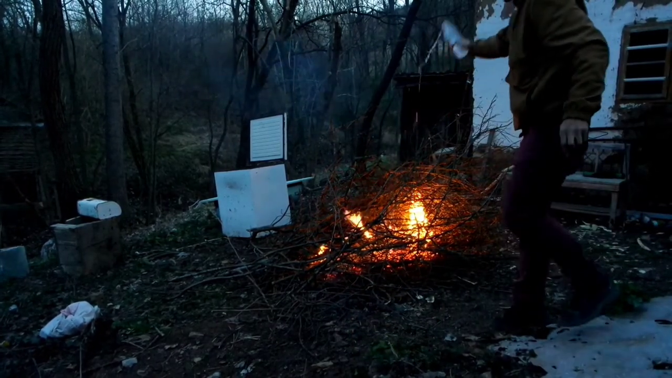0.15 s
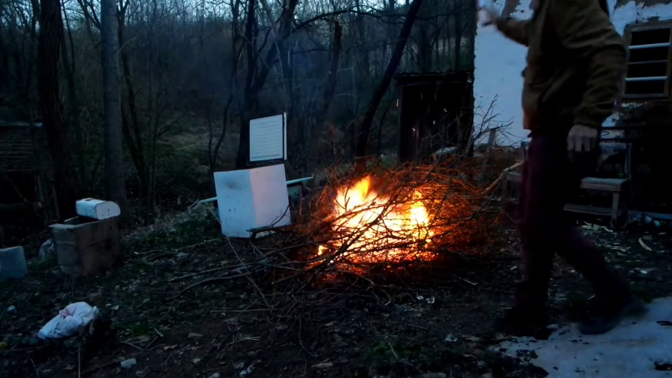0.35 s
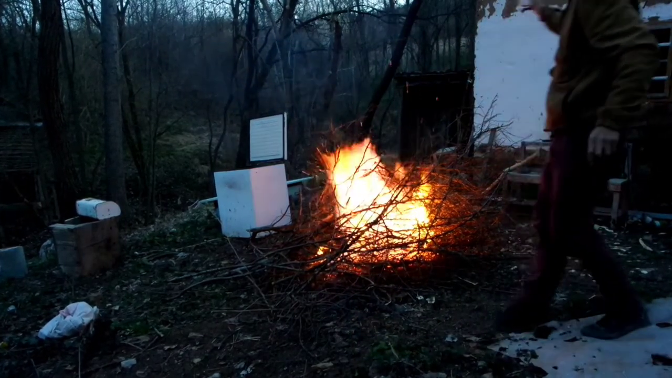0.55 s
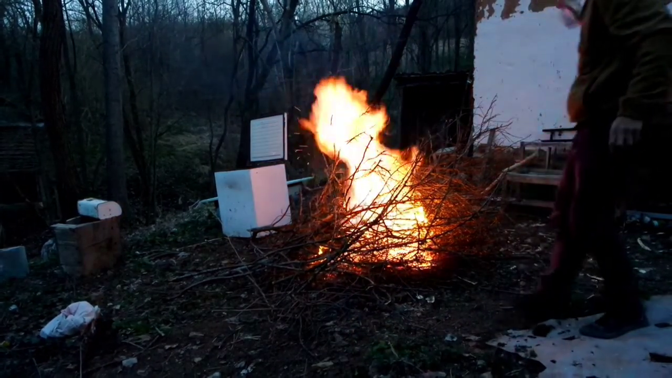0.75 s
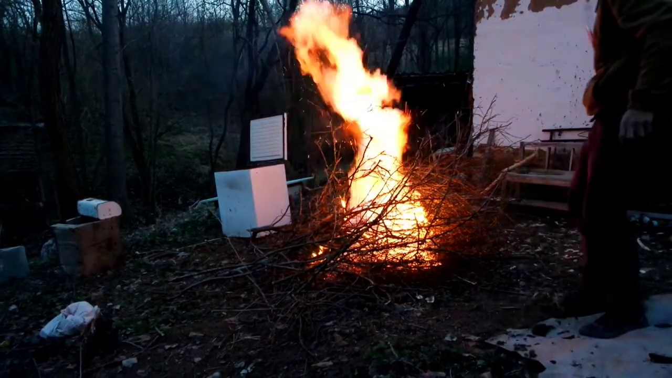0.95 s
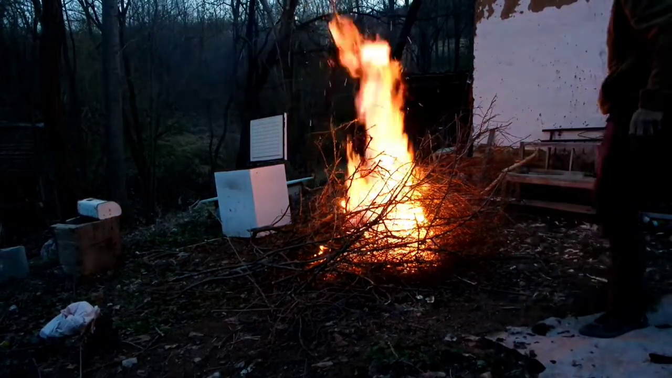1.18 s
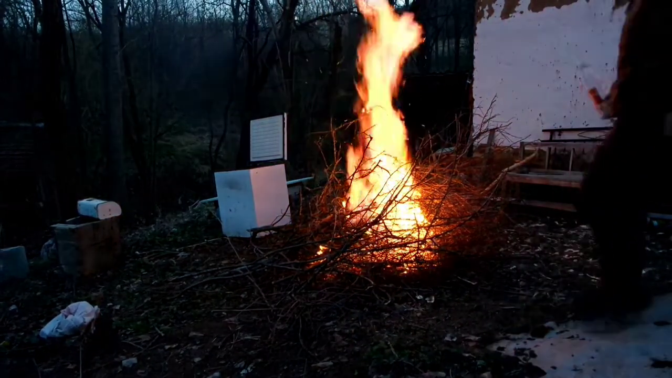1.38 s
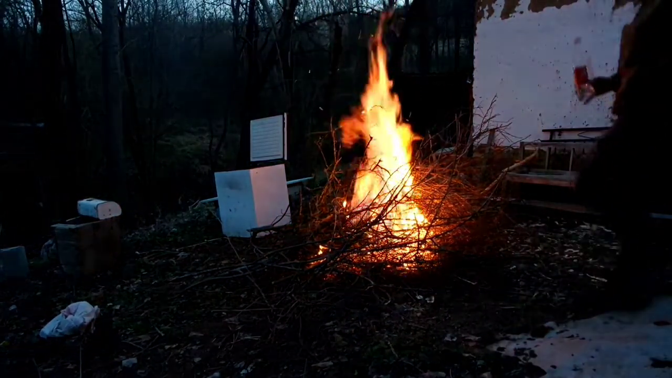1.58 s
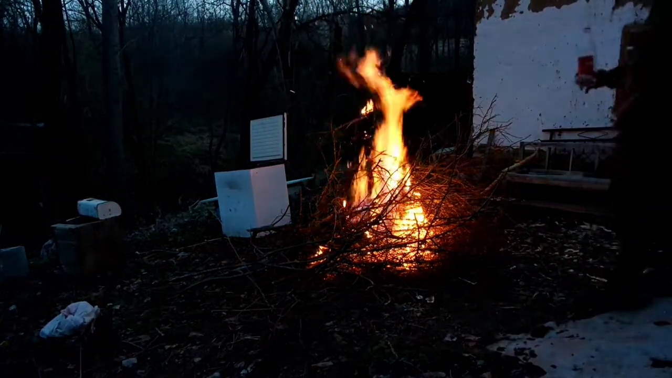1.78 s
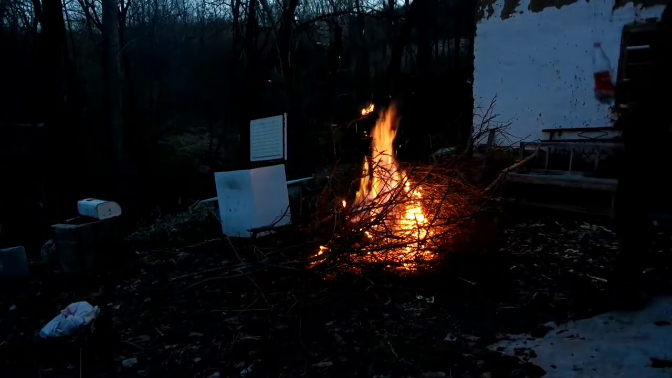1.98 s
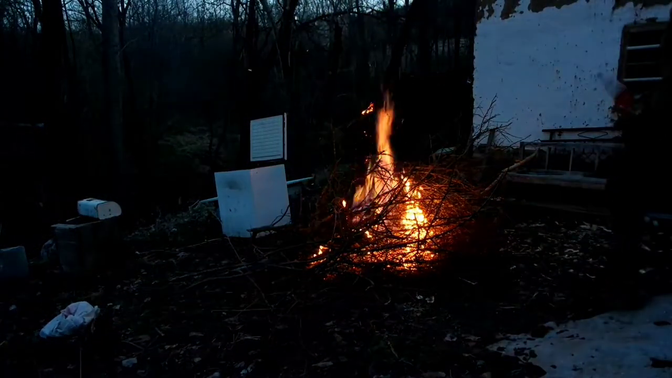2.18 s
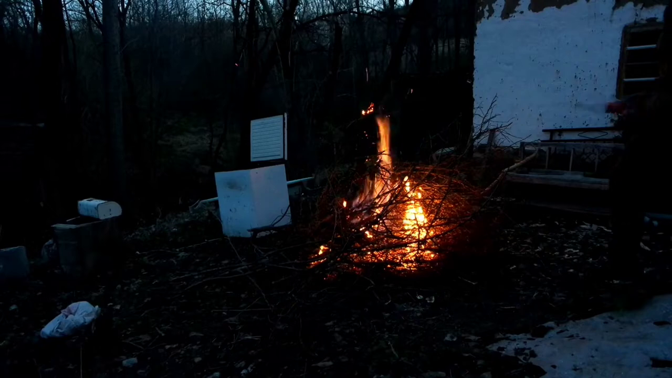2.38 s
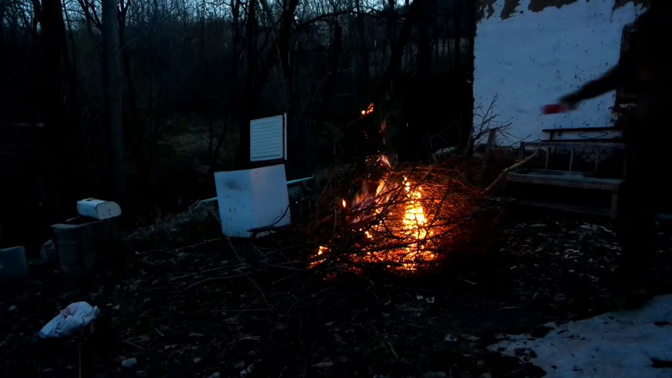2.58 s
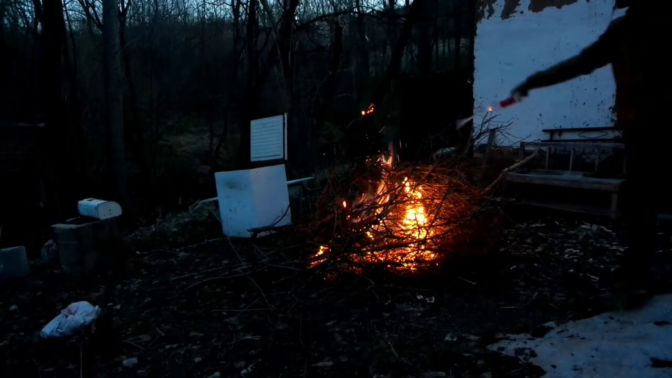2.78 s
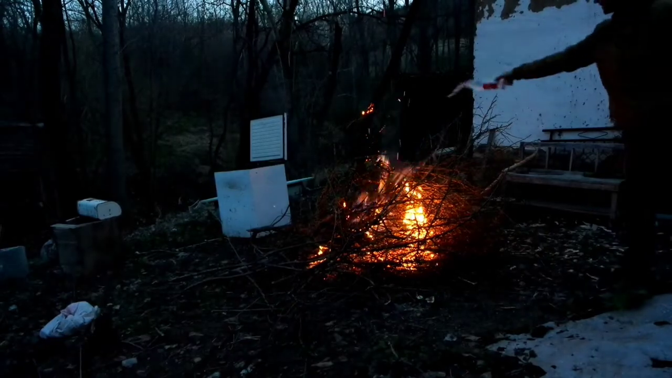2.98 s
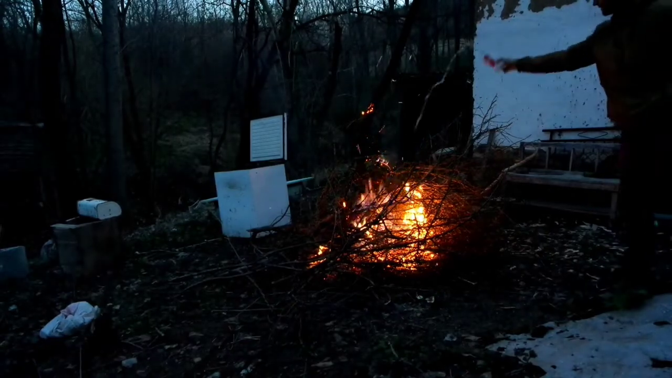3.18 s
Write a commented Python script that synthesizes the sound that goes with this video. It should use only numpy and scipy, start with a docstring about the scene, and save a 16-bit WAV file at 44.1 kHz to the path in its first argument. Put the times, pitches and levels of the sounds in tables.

```python
"""A pile of wet branches flares up in a garden: a rumbling, fluttering flame over sizzling bark.
Flame and bark are shaped noise, faint at first, with a deep whoomph at 0.5 s as the fireball rises.
A songbird whistles gliding notes from the trees behind; steps crunch as swells of grainy noise.
From 0.2 s twigs snap as ringing pulses and fuel splashes down as spatter, flare and puff.
From 0.66 s steam pockets pop as short ringing bursts."""
import sys
import numpy as np
from scipy import signal
from scipy.fft import rfft, irfft
from scipy.io import wavfile
from scipy.ndimage import uniform_filter1d

SR = 44100
rng = np.random.default_rng(int(sys.argv[2]) if len(sys.argv) > 2 else 0)


def unload_wav(signal):
    """Save mono or channel-first audio to the path in sys.argv[1] as 16-bit WAV at rate SR, clipped to [-1, 1]."""
    wavfile.write(
        sys.argv[1],
        SR,
        np.round(np.clip(np.atleast_2d(signal).T, -1, 1) * 32767).astype(np.int16),
    )


N = 145530
T = np.arange(N) / SR


def amp(db):
    """Decibels to gain."""
    return 10 ** (np.asarray(db) / 20)


def evened(x):
    """Scales to rms 1."""
    return x / np.sqrt(np.mean(x ** 2) + 1e-20)


def level(points):
    """Gain over time from (t/s, level/dB) points."""
    return amp(np.interp(T, *np.transpose(points)))


def add(mix, s, sound):
    """Mixes a sound in at time s, cut at the end of the mix."""
    part = mix[max(round(s * SR), 0):][:len(sound)]
    part += sound[:len(part)]


def colour(x, points):
    """Filters x by a curve of (f/Hz, level/dB) points, scaled to rms 1."""
    hz, db = np.transpose(points)
    bins_hz = np.fft.rfftfreq(N, 1 / SR)
    gain = amp(np.interp(np.log(bins_hz + 1), np.log(hz), db))
    return evened(irfft(rfft(x) * gain, N))


def noise(points):
    """Coloured noise, rms 1."""
    return colour(rng.standard_normal(N), points)


def wander(hz):
    """Smooth random signal with a Gaussian roll-off at hz, rms 1."""
    lowpass = np.exp(-(np.fft.rfftfreq(N, 1 / SR) / hz) ** 2)
    return evened(irfft(rfft(rng.standard_normal(N)) * lowpass, N))


def steadied(x, span_s):
    """Divides out the running rms, removing slow swells."""
    return x / np.sqrt(abs(uniform_filter1d(x ** 2, int(span_s * SR))) + 1e-9)


def band(x, hz, q):
    """Second-order band-pass resonance."""
    w = 2 * np.pi * min(hz, SR / 2 - 1) / SR
    a = np.sin(w) / (2 * q)
    return signal.lfilter([a, 0, -a], [1 + a, -2 * np.cos(w), 1 - a], x)


def echoes(x, t60_s, rise_s=0.0019):
    """Diffuse scatter from branches and trees: a decaying noise tail of unit energy."""
    t = T[:SR // 2]
    tail = rng.standard_normal(len(t)) * amp(-60 * t / t60_s) * np.minimum(t / rise_s, 1)
    return signal.fftconvolve(x, tail / np.linalg.norm(tail))[:N]


# flame size, heard as rumble: t/s, level/dB
FLAME_LEVEL = [(0, -73), (.08, -59.5), (.19, -69), (.27, -59), (.33, -59.5), (.44, -52), (.53, -39.5),
               (.76, -40.5), (1.03, -35.5), (1.42, -38.5), (1.62, -38), (1.67, -42.5), (1.76, -38.5),
               (1.96, -37.5), (2.08, -40), (2.3, -42), (2.43, -49.5), (3.12, -53), (3.3, -54)]
# rumble spectrum: f/Hz, relative level/dB
RUMBLE_SPECTRUM = [(12, -5), (27, -6.5), (41, -13), (60, 0.5), (78, -4), (100, -3.5), (113, -5.5), (133, 0),
                   (158, -1), (175, -15), (200, -5), (280, -11), (350, -15), (500, -22), (900, -23.5),
                   (3000, -76)]
# mid-range roar: t/s, level/dB
ROAR_LEVEL = [(0, -50), (.06, -73), (.12, -65.5), (.2, -71.5), (.24, -61), (.45, -58), (.6, -44),
              (.92, -44.5), (1.1, -48), (1.35, -49), (1.56, -45.5), (1.68, -54.5), (1.9, -51), (2.12, -48),
              (2.24, -58.5), (2.44, -62.5), (2.72, -59), (2.82, -59), (2.96, -66.5), (3.08, -59),
              (3.3, -65)]
# roar spectrum: f/Hz, relative level/dB
ROAR_SPECTRUM = [(100, -50), (250, -3.5), (400, 2), (490, -2.5), (570, 1), (700, -10), (1100, -7.5),
                 (1600, -9.5), (2200, -8), (3200, -9.5), (5000, -14), (10000, -24)]
THROB_HZ, THROB_PASS_WIDTH_HZ, THROB_DB = 153.9, 20.4, -6  # main resonance, two passes
WHOOMPH_S, WHOOMPH_HZ, WHOOMPH_Q, WHOOMPH_DB = 0.505, 65.5, 1.7, -41
WHOOMPH_ATTACK_S, WHOOMPH_DECAY_S = 0.0083, 0.35
FLUTTER_RMS_DB, FLUTTER_HZ = 3, 75.6


def flame():
    """A throbbing rumble under a fluttering roar; the rising fireball adds a deep whoomph."""
    q = THROB_HZ / THROB_PASS_WIDTH_HZ
    throb = evened(band(band(rng.standard_normal(N), THROB_HZ, q), THROB_HZ, q))
    rumble = steadied(noise(RUMBLE_SPECTRUM) + amp(THROB_DB) * throb, 0.15)

    flutter = amp(FLUTTER_RMS_DB * wander(FLUTTER_HZ))
    roar = steadied(evened(noise(ROAR_SPECTRUM) * flutter), 0.071)

    deep = band(rng.standard_normal(N), WHOOMPH_HZ, WHOOMPH_Q)
    deep = steadied(band(deep, WHOOMPH_HZ, WHOOMPH_Q), 0.07)
    age_s = np.maximum(T - WHOOMPH_S, 0)
    envelope = np.minimum(age_s / WHOOMPH_ATTACK_S, 1) * np.exp(-age_s / WHOOMPH_DECAY_S)
    whoomph = amp(WHOOMPH_DB) * deep * envelope
    return rumble * level(FLAME_LEVEL) + roar * level(ROAR_LEVEL) + whoomph


# sizzling bark: t/s, level/dB
SIZZLE_LEVEL = [(0, -60), (.2, -70), (.24, -55), (.38, -51.5), (.55, -47.5), (.72, -43.5), (.92, -44),
                (1.05, -48), (1.2, -43.5), (1.42, -45.5), (1.56, -43), (1.67, -49), (1.95, -46),
                (2.14, -48), (2.33, -47), (2.44, -56), (2.8, -60), (2.95, -62), (3.07, -61), (3.3, -55)]
# sizzle spectrum: f/Hz, relative level/dB
SIZZLE_SPECTRUM = [(500, -26), (1800, -4), (2900, -3), (4200, -1), (5300, -4), (6600, -1.5), (8200, 2),
                   (10500, 1), (13000, -2), (15000, -6.5)]
TICKS_PER_S, TICK_DB, HISS_DB = 420, -6, -2.5
HISS_FLICKER_RMS_DB, HISS_FLICKER_HZ = 2.2, 50


def sizzle():
    """Steam hisses from the bark; tiny bursting bubbles tick as random equal impulses."""
    ticks = rng.choice([-1, 1], N) * (rng.random(N) < TICKS_PER_S / SR)
    flicker = amp(HISS_FLICKER_RMS_DB * wander(HISS_FLICKER_HZ))
    hiss = evened(noise(SIZZLE_SPECTRUM) * flicker)
    mixed = amp(HISS_DB) * hiss + amp(TICK_DB) * colour(ticks, SIZZLE_SPECTRUM)
    return mixed * level(SIZZLE_LEVEL)


# bird notes: t/s, length/s, level/dB, start f/Hz, middle f/Hz, end f/Hz
BIRD_NOTES = [(0.015, 0.081, -55.5, 5800, 6140, 4350), (0.131, 0.032, -56, 4100, 4147, 4170),
              (0.236, 0.05, -45.5, 5100, 5060, 5700), (0.347, 0.049, -52, 5400, 4370, 4000),
              (.453, 0.048, -45.5, 5060, 5120, 5670), (0.557, 0.046, -45, 5300, 4500, 3920),
              (0.666, 0.0414, -42, 5110, 5120, 5680), (1.115, .1, -41.5, 6700, 5910, 5860),
              (1.297, 0.045, -46, 4010, 4070, 3500), (1.515, 0.06, -52, 3650, 4070, 4400),
              (1.6, .068, -49, 3550, 3920, 4360), (1.714, 0.077, -47.5, 3330, 3900, 4440),
              (1.833, 0.065, -45.5, 3450, 3810, 4330), (1.951, .064, -45, 3450, 3950, 4760),
              (2.091, 0.11, -48, 7450, 7220, 7030), (2.256, 0.066, -45, 5700, 5100, 3920),
              (2.757, 0.136, -56.5, 2220, 2270, 2166), (3.004, 0.042, -50, 7500, 6950, 6300),
              (3.067, 0.044, -54, 5100, 4070, 3420), (3.191, .052, -50, 6100, 5950, 5960),
              (3.264, .04, -54.5, 6020, 6000, 5920)]
ATTACK_SHARE, RELEASE_SHARE, SWELL_DB = 0.14, 0.16, 7  # shares of length; rise along note
WAVER_RMS, WAVER_HZ = 0.006, 120  # relative pitch
TRUNKS_T60_S, WOOD_DB, WOOD_T60_S, WOOD_RISE_S = 0.09, -4.5, 0.42, 0.018


def bird():
    """Gliding whistles with slight pitch waver, smeared by nearby trunks and by the wood."""
    out, waver = np.zeros(N), 1 + WAVER_RMS * wander(WAVER_HZ)
    for s, length_s, db, start_hz, middle_hz, end_hz in BIRD_NOTES:
        u = np.arange(0, 1, 1 / (length_s * SR))  # share of note elapsed
        glide = np.polyfit([0, 0.5, 1], [start_hz, middle_hz, end_hz], 2)
        hz = np.polyval(glide, u) * np.interp(s + u * length_s, T, waver)
        edges = np.clip(np.minimum(u / ATTACK_SHARE, (1 - u) / RELEASE_SHARE), 0, 1)
        shape = edges * amp(SWELL_DB * (u - 0.5))
        add(out, s, amp(db) * shape * np.sin(2 * np.pi * np.cumsum(hz) / SR))
    scattered = 0.72 * out + 0.5 * echoes(out, TRUNKS_T60_S)
    return scattered + amp(WOOD_DB) * echoes(out, WOOD_T60_S, WOOD_RISE_S)


# steps on snow and litter: swell centre t/s, Gaussian half-width/s, level/dB, band centre f/Hz
STEPS = [(0.048, 0.021, -59.5, 2800), (0.748, .025, -44, 3000), (1.294, 0.039, -37, 8060),
         (1.488, 0.021, -31, 5800), (1.553, 0.0076, -42, 1800), (2.063, 0.015, -40, 730),
         (2.145, 0.016, -44, 2160), (2.302, 0.041, -44, 4120)]
STEP_Q, STEP_GRAIN_RMS_DB, STEP_GRAIN_HZ = 0.28, 4, 270


def steps():
    """Short swells of grainy broadband noise as a boot presses down."""
    out = np.zeros(N)
    for s, width_s, db, hz in STEPS:
        grain = amp(STEP_GRAIN_RMS_DB * wander(STEP_GRAIN_HZ))
        crunch = evened(band(rng.standard_normal(N) * grain, hz, STEP_Q))
        out += amp(db) * crunch * np.exp(-((T - s) / width_s) ** 2)
    return out


# snapping twigs: t/s, level/dB, centre f/Hz
SNAPS = [(0.2142, -31, 11000), (0.2168, -21.5, 8700), (0.226, -23, 9100), (0.2355, -27, 10000),
         (0.2547, -22.5, 3780), (0.2554, -21, 9280), (.2629, -24.5, 10600), (.4351, -26.5, 5900),
         (0.6203, -23.5, 9400), (0.7342, -21.5, 3970), (0.775, -21, 3500), (0.8028, -23.5, 9800),
         (0.859, -7, 10200), (0.859, -31, 9000), (0.9331, -19, 4000), (.9973, -22, 10000),
         (1.028, -23, 10500), (1.0867, -14.5, 8650), (1.156, -23, 6000), (1.271, -23, 8000),
         (1.3, -33, 5000), (1.3125, -18, 9500), (1.3289, -16, 7160), (1.3735, -17.5, 4040),
         (1.408, -24.5, 10100), (1.483, -26, 7040), (1.556, -40, 9000), (1.6328, -28, 9300),
         (1.718, -24.5, 7400), (1.746, -15, 3700), (1.7532, -18, 10300), (1.761, -19, 4670),
         (1.8815, -10.5, 9500), (1.9394, -18.5, 10200), (2.03, -17, 7600), (2.058, -22, 9300),
         (2.081, -25, 8950), (2.0954, -20, 10100), (2.1121, -11, 11000), (2.148, -22, 8900),
         (2.3462, -22.5, 8900), (2.3919, -29, 8900), (2.4631, -25, 10400), (2.514, -24, 8330),
         (2.6197, -28.5, 11000), (2.6416, -24, 9000), (2.6491, -24, 9200), (2.6565, -25.5, 10000),
         (2.663, -30, 9000), (2.721, -27.5, 9100), (2.742, -14, 3700), (2.7484, -19.5, 4020),
         (2.7523, -11.5, 8400), (2.7563, -18, 5000), (2.8067, -30, 9000), (2.848, -29.5, 8950),
         (2.8734, -37, 8000), (2.9995, -23, 9500), (3.0115, -32, 9300), (3.1203, -34.5, 9100),
         (3.2838, -40, 9900)]
PULSE_DECAY_S, PULSE_Q = 0.00004, 0.86
SPLINTER_DECAY_S, SPLINTER_DB, SPLINTER_QS = 0.00099, -9, (0.56, 0.59)
TWIG_DECAY_S, TWIG_DB, TWIG_Q = 0.0015, -13.5, 3.1
EXPOSED_DB, BURIED_SLOPE = -9, 0.56  # below this level: extra pulse loss, dB per dB


def snaps():
    """Each twig breaks with a sharp pulse, splinters and rings; faint ones have a softer pulse."""
    out, t = np.zeros(N), T[:800]
    for s, db, hz in SNAPS:
        pulse = band(np.exp(-t / PULSE_DECAY_S) * np.sin(2 * np.pi * hz * t + 1), hz, PULSE_Q)
        pulse *= amp(BURIED_SLOPE * min(db - EXPOSED_DB, 0)) / abs(pulse).max()
        splinters, twig = rng.standard_normal((2, len(t)))
        splinters = band(band(splinters, hz, SPLINTER_QS[0]), hz, SPLINTER_QS[1])
        splinters = evened(splinters) * np.exp(-t / SPLINTER_DECAY_S)
        twig = evened(band(twig, hz, TWIG_Q)) * np.exp(-t / TWIG_DECAY_S)
        add(out, s, amp(db) * (pulse + amp(SPLINTER_DB) * splinters + amp(TWIG_DB) * twig))
    return out


# fuel splashes on twigs: t/s, spatter level/dB, puff level/dB
SPLASHES = [(0.217, -47.5, -55.5), (2.7417, -37.5, -44.5), (2.999, -42.5, -52)]
# spatter spectrum: f/Hz, relative level/dB
SPLASH_SPECTRUM = [(200, -63), (600, 0), (1200, -3), (2500, 3), (6000, -1), (9000, 8), (12000, 1),
                   (15000, -17)]
SPATTER_DECAY_S, SPATTER_GRAIN_RMS_DB, SPATTER_GRAIN_HZ = 0.039, 1.17, 720
FLARE_DECAY_S, FLARE_DB, PUFF_PEAK_S = 0.14, -18, 0.045  # flare relative to spatter


def splashes():
    """Drops spatter on the twigs with a fading flare; the fuel catches with a soft, later puff."""
    out = np.zeros(N)
    for s, db, puff_db in SPLASHES:
        grain = amp(SPATTER_GRAIN_RMS_DB * wander(SPATTER_GRAIN_HZ))
        spatter = evened(noise(SPLASH_SPECTRUM) * grain) * np.exp(-T / SPATTER_DECAY_S)
        flare = noise(ROAR_SPECTRUM) + 0.4 * noise(SIZZLE_SPECTRUM)
        flare *= np.exp(-T / FLARE_DECAY_S)
        u = T / PUFF_PEAK_S
        puff = steadied(noise(RUMBLE_SPECTRUM), 0.03) * (u * np.exp(1 - u)) ** 2
        add(out, s, amp(db) * (spatter + amp(FLARE_DB) * flare) + amp(puff_db) * puff)
    return out


# steam pockets popping in wood: t/s, level/dB, f/Hz, decay/s
POPS = [(.664, -21, 2260, .0015), (.735, -27, 640, 0.0018), (.775, -30, 2670, 0.0011),
        (0.8192, -23, 770, 0.0019), (.821, -29, 1200, 0.0019), (0.821, -29.5, 409, 0.0052),
        (.82, -16, 189, 0.0042), (.929, -25.5, 1600, 0.0011), (1.297, -14.5, 2400, 0.00037),
        (1.3722, -24.5, 710, 0.0017), (1.54, -20, 2000, 0.00079), (2.008, -30.5, 656, 0.0037),
        (2.05, -34, 490, 0.0028), (2.078, -29.5, 610, 0.0033), (2.974, -39, 2620, 0.0018),
        (3.251, -42.5, 3980, 0.0016)]


def pops():
    """Bursts duller than the snaps: a decaying sine with band noise at the same pitch."""
    out, t = np.zeros(N), T[:3000]
    for s, db, hz, decay_s in POPS:
        breath = evened(band(rng.standard_normal(len(t)), hz, 1.3))
        body = np.sin(2 * np.pi * hz * t) + 0.44 * breath
        envelope = np.exp(-t / decay_s) * (1 - np.exp(-t * hz * 2))
        add(out, s, amp(db) * body * envelope)
    return out


PILE_DB, PILE_T60_S, YARD_DB, YARD_T60_S = -18, 0.16, -7.5, 0.12


def scene():
    """Sums all sources; snaps and pops also scatter in the pile and the yard."""
    cracks = snaps() + pops()
    pile = amp(PILE_DB) * echoes(cracks, PILE_T60_S)
    yard = amp(YARD_DB) * echoes(cracks, YARD_T60_S)
    mix = flame() + sizzle() + bird() + steps() + cracks + pile + yard + splashes()
    return mix[None]


EDGE_HZ = 15200


def record(dry):
    """Linear-phase low-pass at EDGE_HZ."""
    lowpass = signal.firwin(255, EDGE_HZ, window=("kaiser", 8), fs=SR)
    return signal.oaconvolve(dry, lowpass[None], "same")


dry = scene()
out = record(dry)
unload_wav(out)
```